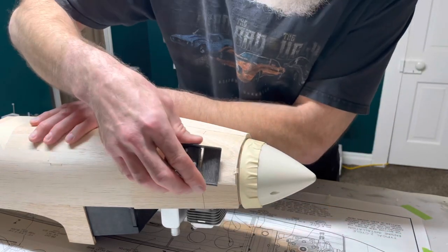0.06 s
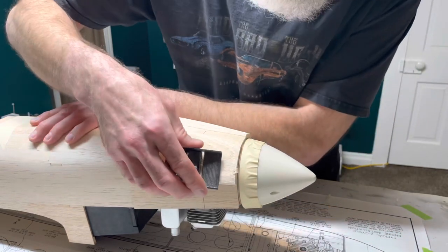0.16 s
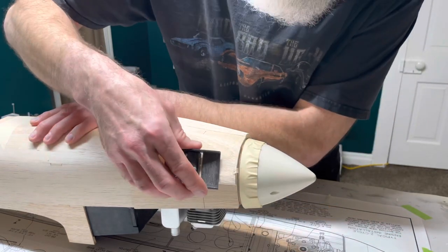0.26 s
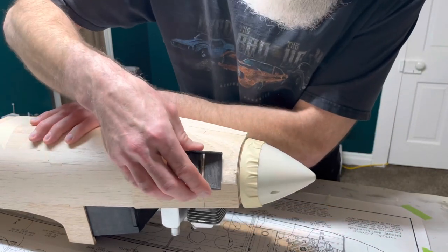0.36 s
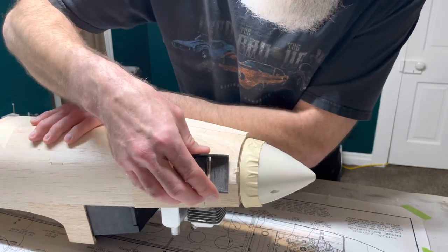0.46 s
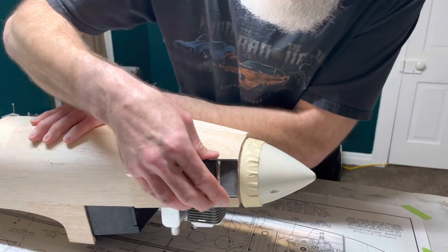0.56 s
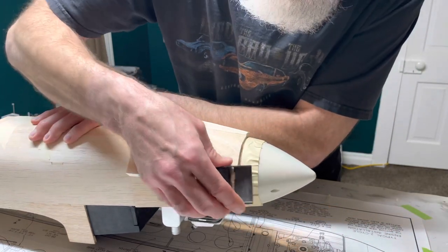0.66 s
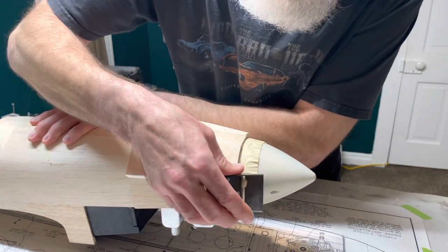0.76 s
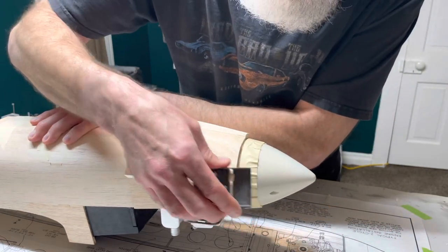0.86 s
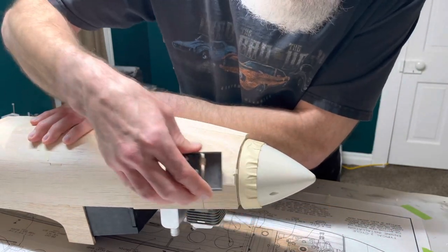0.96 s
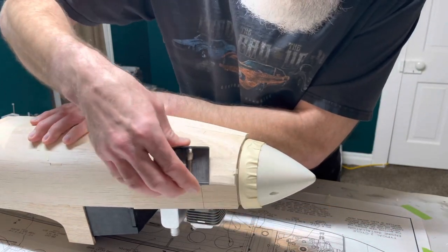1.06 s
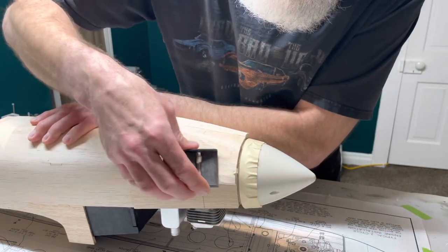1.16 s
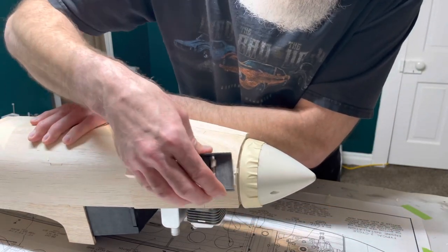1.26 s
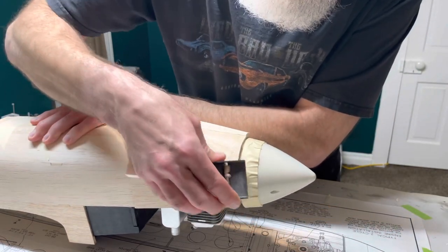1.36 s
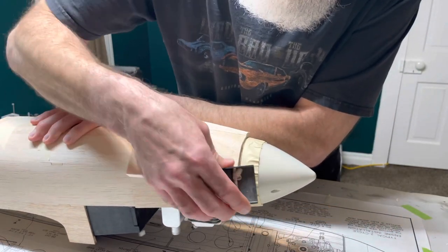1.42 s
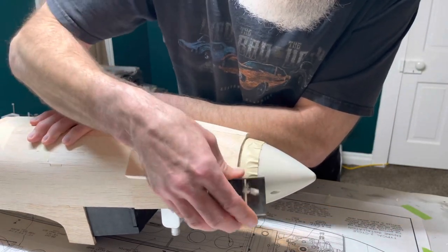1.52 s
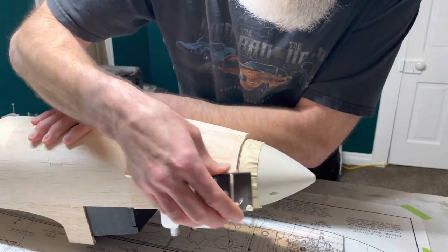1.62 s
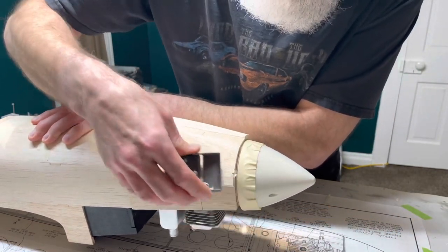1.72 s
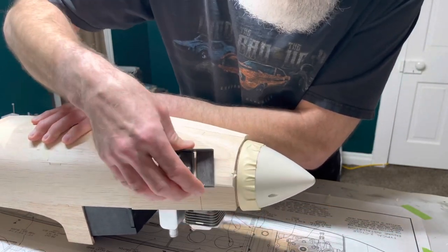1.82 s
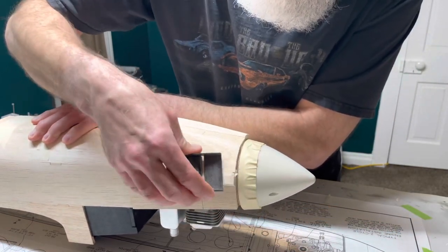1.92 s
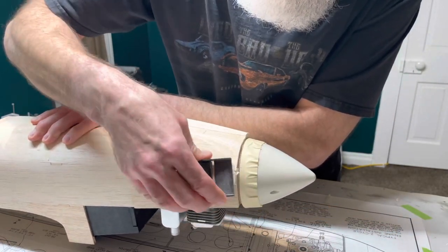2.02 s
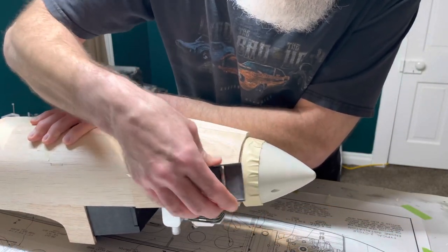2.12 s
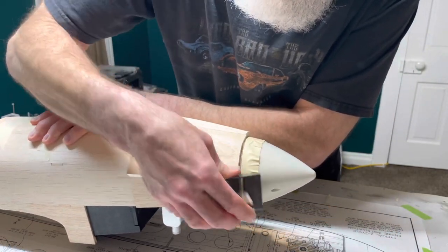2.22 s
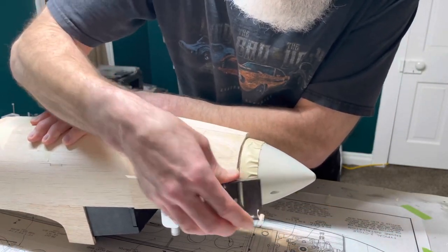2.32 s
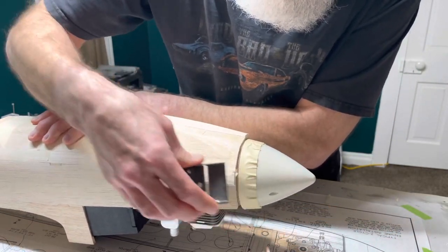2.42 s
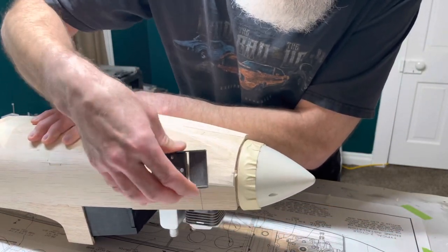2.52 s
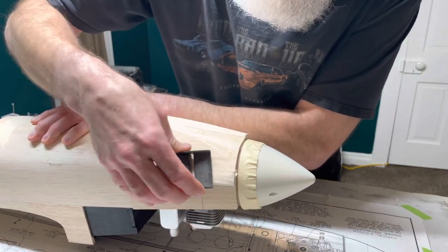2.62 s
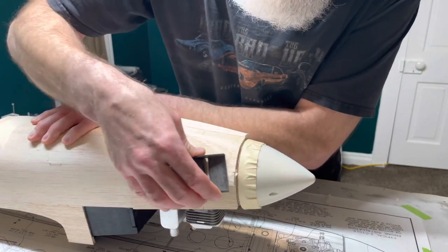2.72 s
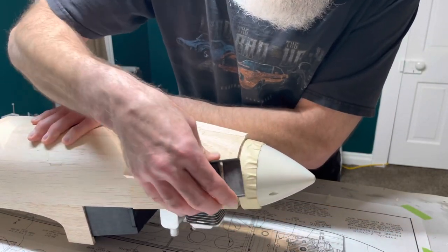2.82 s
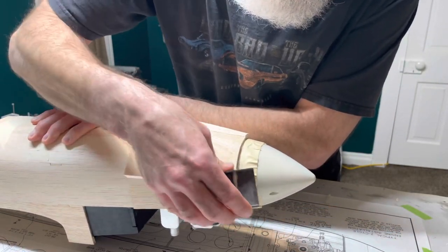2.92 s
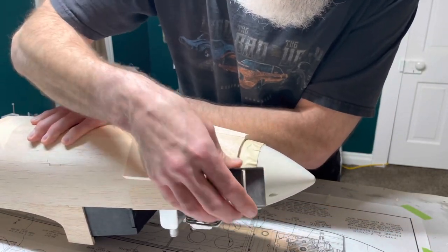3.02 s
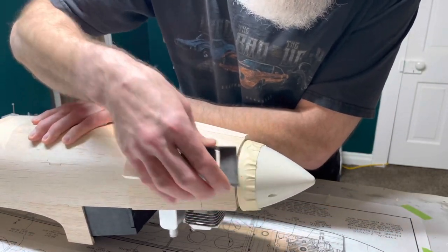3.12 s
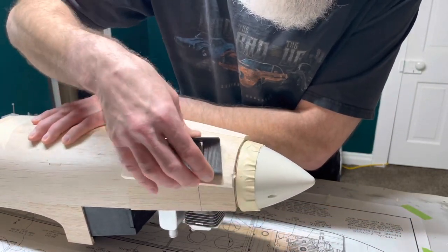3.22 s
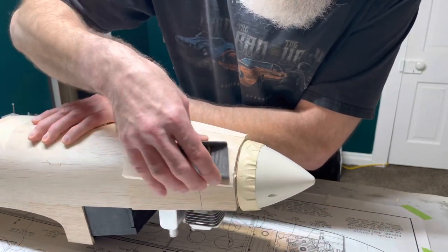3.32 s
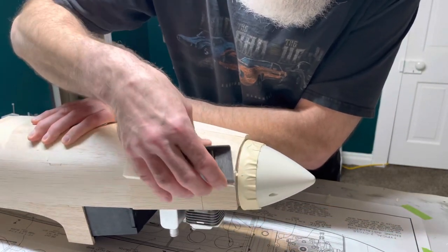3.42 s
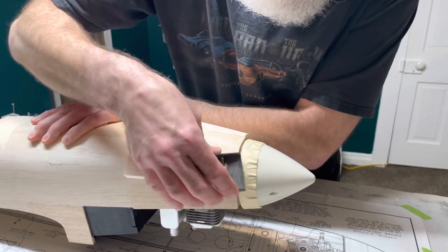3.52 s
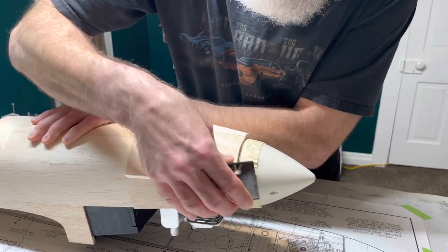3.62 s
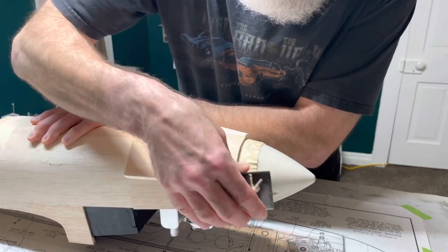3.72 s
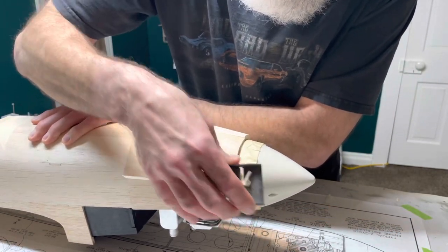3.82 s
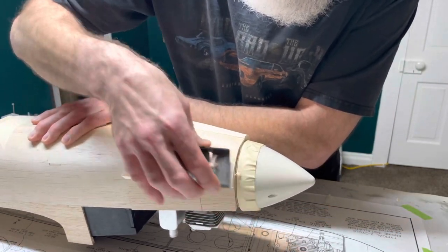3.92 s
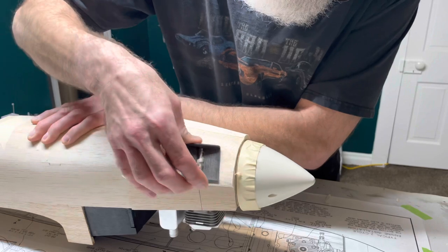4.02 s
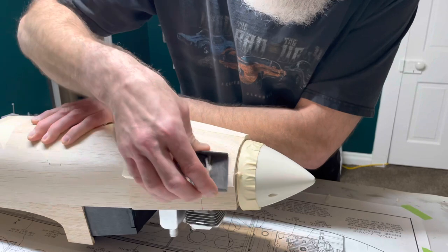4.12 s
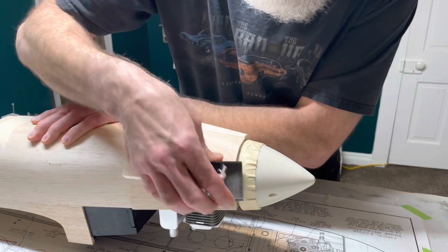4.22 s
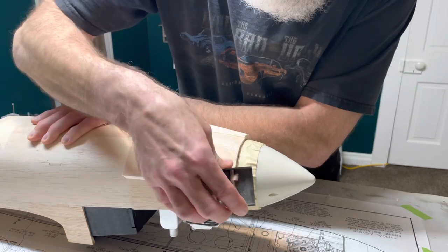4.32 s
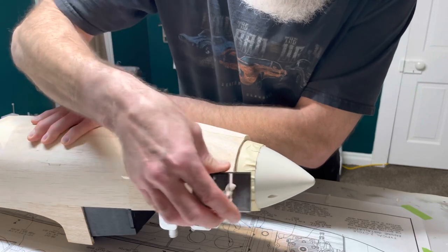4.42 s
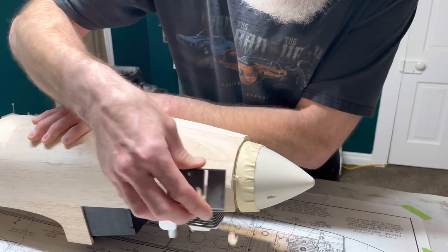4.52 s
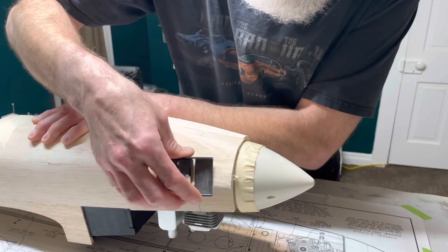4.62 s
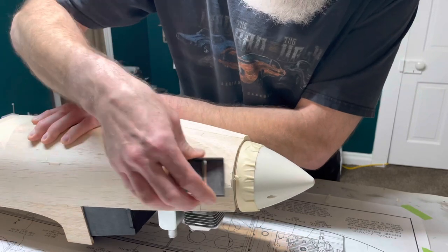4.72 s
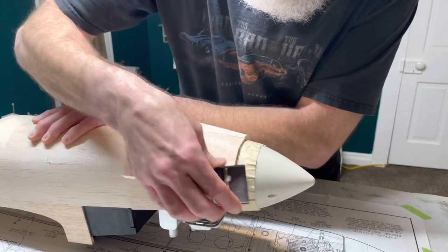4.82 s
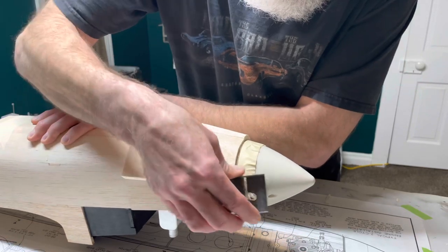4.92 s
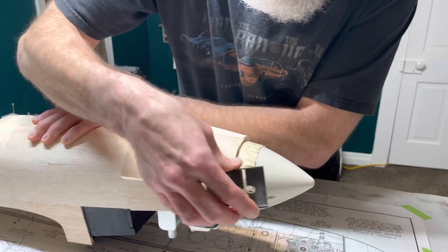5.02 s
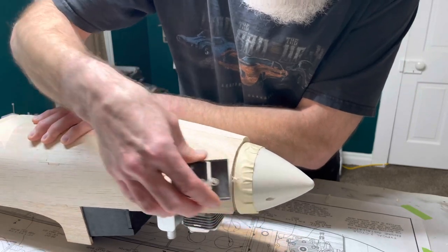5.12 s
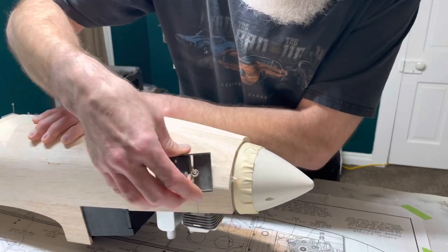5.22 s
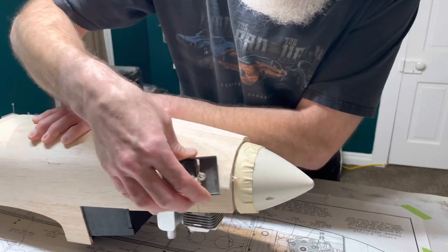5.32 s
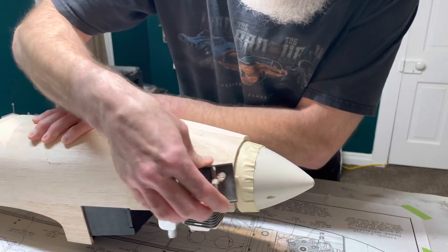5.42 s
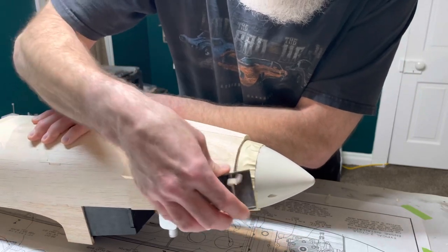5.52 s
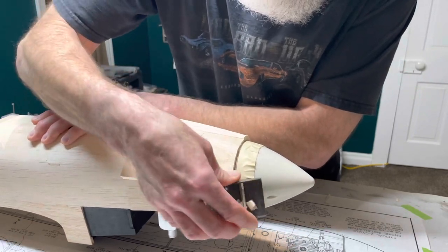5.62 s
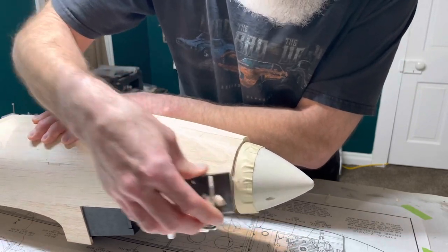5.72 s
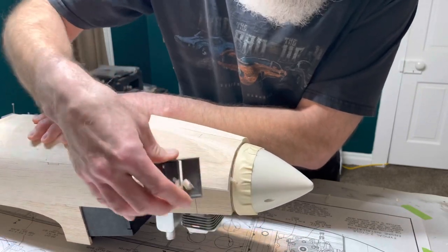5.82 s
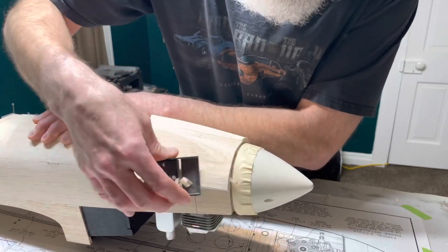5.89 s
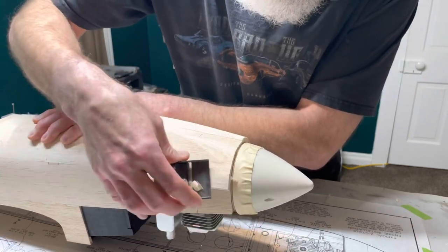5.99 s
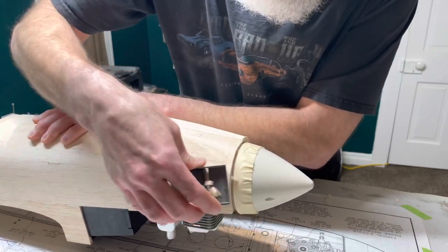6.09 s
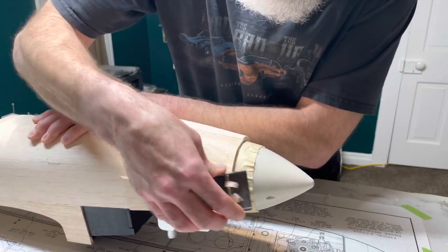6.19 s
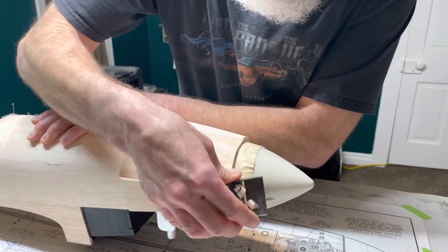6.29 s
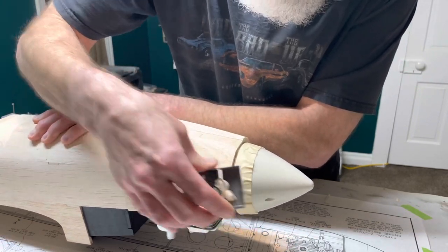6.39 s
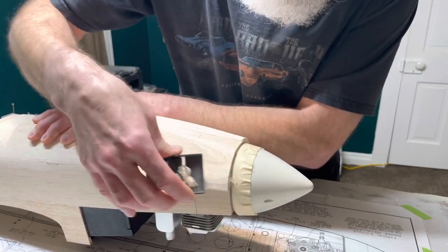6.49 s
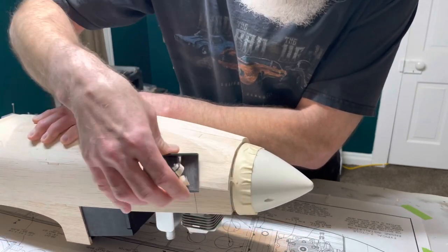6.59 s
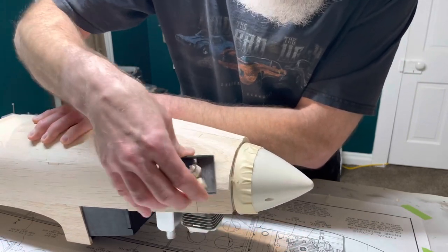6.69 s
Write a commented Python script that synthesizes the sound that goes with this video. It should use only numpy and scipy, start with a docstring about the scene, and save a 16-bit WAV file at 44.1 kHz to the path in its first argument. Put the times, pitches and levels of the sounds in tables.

```python
"""Planing a balsa hull

A small razor plane shaves the nose of a hollow balsa hull, close to a two-port mic in a quiet room.
Each stroke lands with a knock, tears fibres and lifts; the sole scuffs off the end and is drawn back.
Knocks and cut ring the same hull modes, and the hull rocks on its rest with dull thumps."""
import sys
import numpy as np
from scipy import signal
from scipy.fft import rfft, irfft, next_fast_len
from scipy.io import wavfile
from scipy.ndimage import uniform_filter1d, map_coordinates

SR = 44100
rng = np.random.default_rng(int(sys.argv[2]) if len(sys.argv) > 2 else 0)


def master_out(mix):
    """Clip the mix to full scale and print it as 16-bit PCM to the path in sys.argv[1]."""
    frames = np.transpose(np.atleast_2d(mix))
    ceiling = np.clip(frames, -1, 1)
    pcm = np.round(ceiling * 32767).astype(np.int16)
    wavfile.write(sys.argv[1], SR, pcm)


N = 297675
TIME = np.arange(N) / SR


def amp(db):
    """Decibels to gain."""
    return 10 ** (np.asarray(db) / 20)


def unit(x):
    """Scale to rms 1."""
    return x / np.sqrt(np.mean(x ** 2) + 1e-20)


def along(points, hz):
    """Read (f/Hz, value, ..) rows on a log frequency axis."""
    f, *cols = np.transpose(points)
    return np.squeeze([np.interp(np.log(hz + 1), np.log(f + 1), c) for c in cols])


def faders(spans, fade=0.012):
    """Gain curves from spans of (t/s, level/dB, ..) rows, fading beyond each span's ends."""
    total = np.zeros((len(spans[0][0]) - 1, N))
    for rows in spans:
        s, *cols = np.transpose(rows)
        span = slice(max(0, int((s[0] - fade) * SR)), int((s[-1] + fade) * SR))
        gate = np.clip(1 + np.minimum(TIME[span] - s[0], s[-1] - TIME[span]) / fade, 0, 1)
        total[:, span] += gate * amp([np.interp(TIME[span], s, c) for c in cols])
    return total


def decays(hits, t60, rise):
    """Percussive envelopes at (t/s, level/dB) hits."""
    out, t = np.zeros(N + SR), np.arange(SR // 2) / SR
    for s, db in hits:
        out[round(s * SR):][:len(t)] += amp(db - 60 * t / t60) * np.minimum(t / rise, 1)
    return out[:N]


def wobble(rate):
    """A smooth random curve, rate knots a second."""
    return map_coordinates(rng.standard_normal(int(N * rate / SR) + 4), [TIME * rate])


def noise():
    """Two white noises: one shared by left and right, one opposed."""
    return rng.standard_normal((2, N))


def filtered(x, response):
    """Apply a complex frequency response."""
    size = next_fast_len(N + SR // 2)
    return irfft(rfft(x, size) * response(np.fft.rfftfreq(size, 1 / SR)), size)[..., :N]


def coloured(x, spectrum):
    """EQ by (f/Hz, gain/dB) rows, then scale to rms 1."""
    return unit(filtered(x, lambda hz: amp(along(spectrum, hz))))


def fibres(grit_db, patchy_db=2):
    """Densely snapping fibres, uneven in strength and patchy in colour as the grain changes."""
    bins = signal.stft(noise(), nperseg=512)[2]
    grain = uniform_filter1d(rng.standard_normal(bins.shape[1:]), size=7, axis=0)
    grain = uniform_filter1d(grain, size=8, axis=1)
    patchy = signal.istft(bins * amp(patchy_db * unit(grain)), nperseg=512)[1][:, :N]
    return unit(patchy * amp(grit_db * (wobble(900) + 1.54 * wobble(90))))


def stereo(x, coherence, log_ratio=lambda hz: 0):
    """Decode mid and side; log_ratio is the log of the complex left-right ratio."""
    angle = lambda hz: np.arccos(np.clip(coherence(hz), 0, 1)) / 2
    mid, side = filtered(x, lambda hz: np.array([np.cos(angle(hz)), np.sin(angle(hz))]))
    left_right = np.array([mid + side, mid - side])
    return filtered(left_right, lambda hz: np.exp(np.outer([.5, -.5], log_ratio(hz))))


# Room decay: f/Hz, t60/s
ROOM_DECAY = [(200, 0.36), (2000, 0.33), (12000, 0.049)]
def room(x):
    """A short stereo reverb whose treble dies first."""
    hz, t, bins = signal.stft(rng.standard_normal((2, SR // 2)), SR, nperseg=256)
    tail = signal.istft(bins * amp(-60 * t / along(ROOM_DECAY, hz)[:, None]), SR, nperseg=256)[1]
    delayed = np.pad(x, (300, 0))[None]
    return signal.fftconvolve(delayed, tail / np.linalg.norm(tail[0]), axes=1)[:, :N]


# Rumble fader: t/s, level/dB
RUMBLE_FADER = [(0, -62.5), (.8, -57.5), (3.2, -55.5), (5.7, -59.5), (6.75, -56)]
# Rumble EQ: f/Hz, gain/dB
RUMBLE_EQ = [(20, -33), (30, -10), (48, 3), (72, -0.5), (102, -2), (135, -9), (195, -3.5), (400, -48)]
def rumble():
    """A lumpy low bed."""
    lumps = amp(3.1 * wobble(5.5))
    return faders([RUMBLE_FADER])[0] * unit(lumps * coloured(noise(), RUMBLE_EQ))


# Faint tone pair: f/Hz, gain/dB
TONE_PAIR = [(368, 18.5), (551, 17.5)]
# Tone pair fader cues: t/s, length/s, opening gain/dB
TONE_CUES = [(2.315, 0.33, -78), (3.037, 0.67, -70.5), (5.004, 0.1, -67), (5.685, 0.11, -69.5)]
def faint_tones(fall_db=12):
    """Faint wavering tones come in short, fading spells."""
    gain = faders([[(s, db), (s + length, db - fall_db)] for s, length, db in TONE_CUES])[0]
    return gain * sum(amp(db) * np.sin(2 * np.pi * hz * TIME + .5 * wobble(11)) for hz, db in TONE_PAIR)


# Low glide: t/s, f/Hz, level/dB
GLIDE = [(0, 170, -61), (.1, 188.3, -67.5), (0.289, 144.4, -62), (.36, 105, -64), (.46, 103, -62)]
def sinking_tone():
    """A faint low tone lifts a little, then slides down."""
    s, hz, db = np.transpose(GLIDE)
    phase = 2 * np.pi * np.cumsum(np.interp(TIME, s, hz)) / SR
    return faders([list(zip(s, db))])[0] * np.sqrt(2) * np.sin(phase)


# Back strokes, each lasting until the next cut: t/s, brush/dB, its fall/dB, drone/dB, its fall/dB
BACK_STROKES = [(0, -68, 2, -72.5, 0), (0.801, -67.5, -2, -59, 12), (1.568, -68, -5.5, -60, -1),
                (2.298, -63, 12, -65, -7), (3.002, -63, 6.5, -56.5, 2), (3.751, -57.5, 24, -50.5, 16),
                (4.378, -67.5, -5.5, -53, -2), (4.992, -60, 9.5, -57, 1), (5.648, -63.5, -1, -62, -1),
                (6.312, -64, 6, -54.5, 14)]
def back_stroke_gains():
    """Relative gains of the brushing and the hull's drone as the plane is drawn back."""
    return faders([[(s, brush, drone), (stroke[0], brush - brush_fall, drone - drone_fall)]
                   for (s, brush, brush_fall, drone, drone_fall), stroke in zip(BACK_STROKES, CUTS)])


# Brushing EQ: f/Hz, gain/dB
BRUSH_EQ = [(600, -13), (1200, 4), (2500, -6.5), (6500, -10), (10000, -16), (15500, -28)]
def brushing(floor_db=-85):
    """The returning plane brushes the wood, over a steady hiss of the same colour."""
    gain = amp(4) * back_stroke_gains()[0] + amp(floor_db)
    return gain * coloured(fibres(grit_db=1), BRUSH_EQ)


# Stereo image of the bed: f/Hz, coherence/0-1
BED_IMAGE = [(90, .97), (260, .7), (600, .15), (2000, 0), (4500, .4), (9500, .4), (13000, .9)]
def background():
    """Rumble, faint tones and brushing from all around."""
    return stereo(rumble() + faint_tones() + sinking_tone() + brushing(), lambda hz: along(BED_IMAGE, hz))


# Stereo image of the work: f/Hz, coherence/0-1, left lead/rad, left over right/dB
MIC_IMAGE = [(90, .95, 0, .3), (260, .8, .2, 2.8), (600, .5, .7, 4.6), (1400, .4, .7, 3),
             (2500, .5, 1.8, 1.7), (3600, .35, 2.6, 4.5), (6500, .1, 3.3, 4.2), (8000, .65, 3.3, 1.8),
             (8900, .93, 3.1, 0), (10600, .75, 2, .2), (12000, .8, .5, 0), (13000, 1, 0, 0)]
def mic_ports(x):
    """The two ports catch the close work at different phases and levels."""
    log_ratio = lambda hz: [0, 1j, np.log(10) / 20] @ along(MIC_IMAGE, hz)
    return stereo(x, lambda hz: along(MIC_IMAGE, hz)[0], log_ratio)


def radiated(x):
    """The light hull radiates no deep bass."""
    return filtered(x, lambda f: (1j * f / (170 + 1j * f)) ** 3)


# Rocking hits: t/s, level/dB, f/Hz
ROCKS = [(2.388, -34, 202), (3.058, -37.5, 258), (3.078, -27.5, 257), (3.101, -61, 417),
         (3.302, -34.5, 360), (3.818, -27.5, 246), (4.479, -29.5, 220), (4.564, -36, 305)]
# Scrape EQ: f/Hz, gain/dB
SCRAPE_EQ = [(150, -3.5), (350, 4), (800, -7.5), (1300, -12.5), (2200, -51)]
def thumps(rise_s=.004, t60_cycles=30):
    """The hull rocks: a short shudder around one pitch and a rough scrape on the rest."""
    out, t = np.zeros((2, N + SR)), np.arange(SR // 4) / SR
    for s, level_db, hz in ROCKS:
        tones = hz * np.array([[.9], [1.1], [1.45], [2.1]])
        phase = 2.96 * rng.standard_normal((2, 4, 1))
        decay = amp(np.array([[0], [-1], [-3], [-8]]) - 60 * t * tones / t60_cycles)
        ring = decay * np.sin(2 * np.pi * tones * t + phase) * (1 - np.exp(-t / rise_s))
        out[:, round(s * SR):][:, :len(t)] += amp(level_db) * ring.sum(1)
    scrape = coloured(fibres(grit_db=1.3), SCRAPE_EQ)
    scrape *= decays([row[:2] for row in ROCKS], t60=0.23, rise=0.0045)
    return radiated(out[:, :N]) + amp(-11) * scrape


# Sole friction EQ: f/Hz, gain/dB
SOLE_EQ = [(500, -6.5), (1500, -5), (3000, 5.5), (5000, -9), (8000, -18), (15000, -52)]
# Edge hiss EQ: f/Hz, gain/dB
EDGE_EQ = [(6000, -43), (8500, -11), (10500, 10.5), (12000, 10.5), (13500, 4), (15500, -2)]
# Slips: t/s, relative sole level/dB, edge level/dB
SLIPS = [(1.565, -46, -76), (2.2969, -39, -51.5), (3.001, -39, -56), (3.7457, -37, -50), (4.374, -60, -42),
         (4.385, -40, -53), (4.992, -41, -57), (5.679, -52, -82), (6.329, -52, -90)]
def scuffs():
    """The sole slips off the wood: a flick of friction with a longer rustle behind it."""
    sole, edge = [(s, db) for s, db, _ in SLIPS], [(s, db) for s, _, db in SLIPS]
    snap = amp(-2.5) * decays(sole, t60=0.072, rise=0.00032)
    rustle = amp(-6.5) * decays(sole, t60=0.25, rise=0.0084)
    flick = decays(edge, t60=0.063, rise=0.00074) * coloured(noise(), EDGE_EQ)
    return (snap + rustle) * coloured(noise(), SOLE_EQ) + flick


# Hull modes: f/Hz, gain/dB, t60 before added damping/s
HULL_MODES = [(300.8, 2.5, 0.066), (327.3, 3.5, 0.1), (364.6, 4, 0.12), (416.6, -2, 0.18),
              (463.5, -5, 0.17), (552, -3, 0.093), (634, -1, 0.056), (664.7, 0.5, 0.11), (738, 1, 0.068),
              (836, -3, 0.02), (1003, -5.5, 0.048), (1111, 0, 0.062), (1288, -2, 0.018), (1629, -3, 0.28),
              (1533, 0, .13), (1690, 2, .24), (1765, 0, .2), (1865, 2.5, .075), (2184, -1, 0.026),
              (2865, -7.5, 0.014), (3380, -4, 0.079), (3850, -6, 0.038), (4200, -8.5, 0.029),
              (4980, -10.5, 0.038), (5970, -15, 0.0061)]
def hull(f, damping):
    """Resonator bank of the hollow hull; the hand on the wood widens each mode."""
    total = 0
    for k, (hz, db, t60) in enumerate(HULL_MODES):
        width = damping * np.log(1000) / (np.pi * t60)
        total = total + (-1) ** k * amp(db) * 1j * f * width / (hz * hz - f * f + 1j * f * width)
    return total


# Landings: t/s, relative level/dB, spot pitch/Hz, trims of the low, upper, plate and high modes/dB,
# rebound loss/dB, flight/s
LANDINGS = [(0.133, -25, 730, -4.5, -41, -24.5, -27.5, 35, 0.03),
            (1.037, -32, 700, 0.5, -20, -21, -16.5, 22, 0.036),
            (1.755, -19, 701, -6.5, -14.5, -18, -21, 1.5, 0.0097),
            (2.509, -22, 715, -1, -31, -19.5, -22.5, 27, 0.025),
            (3.203, -29, 740, 2.5, -6, -27, -12.5, 29, 0.025),
            (3.998, -28.5, 702, -3, -14, -29, -31, 6, 0.026),
            (4.619, -9.5, 661, -17, -25.5, -15, -15.5, 34, 0.022),
            (5.197, -18, 700, -5, -15.5, -22, -14.5, 32, 0.026),
            (5.864, -18.5, 706, -4, -27, -24, -22.5, 30, 0.03),
            (6.544, -15, 694, -10.5, -33, -18.5, -26, 24, 0.026)]
def contacts(low_db=-7.5, higher_db=-16.5):
    """Each landing and its one rebound, whose trimmed bands sit these dB under the landing's."""
    rebounds = [(s + flight, db - loss, hz, low + loss + low_db, *(np.array(higher) + loss + higher_db))
                for s, db, hz, low, *higher, loss, flight in LANDINGS]
    return [row[:-2] for row in LANDINGS] + rebounds


def knocks(lead_s=.002, ring_share=0.76):
    """The plane lands, strikes the hull modes and rattles the wood; resting there shortens the ring."""
    out, t = np.zeros((2, N + SR)), np.arange(SR // 6) / SR
    hz, db, t60 = np.transpose(HULL_MODES)[:, :, None]
    side_phase = np.reshape([0, 1.1], (2, 1, 1))
    rise_s = np.select([hz < 580, hz < 900], [.0032, .0028], .0008)  # low modes swing up later
    damped = (hz > 580) * (abs(hz - 1650) > 150)  # the plane checks their big first swing
    attack = (1 - np.exp(-t / rise_s)) ** 2 * (1 + 3.6 * damped * np.exp(-t / 0.012))
    for s, level_db, spot_hz, low_db, upper_db, plate_db, high_db in contacts():
        spot_db = -14 * np.minimum(abs(hz - spot_hz) / 110, 1.3)
        trim_db = np.select([hz < 580, hz < 900, hz < 1400, hz < 2000],
                            [low_db, spot_db, upper_db, plate_db], high_db)
        gain_jitter, phase_jitter = rng.standard_normal((2, 2, len(hz), 1))
        # Loose joints blur each mode.
        drift = np.cumsum(rng.standard_normal((len(hz), len(t))), 1) * np.sqrt(hz * 0.022 / SR)
        decay = amp(db + trim_db + 2.6 * gain_jitter - 60 * t / (ring_share * t60))
        ring = attack * decay * np.sin(2 * np.pi * hz * t + drift + 0.38 * phase_jitter + side_phase)
        mid_side = amp(level_db + np.array([[0], [-6]]))
        out[:, round((s - lead_s) * SR):][:, :len(t)] += mid_side * ring.sum(1)
    bright = [(s - lead_s, level_db + high_db) for s, level_db, *_, high_db in contacts()]
    rattle = unit(filtered(noise(), lambda f: hull(f, damping=3.9) * f ** 2 / (f ** 2 + 1700 ** 2)))
    rattle *= decays(bright, t60=0.12, rise=0.0012)
    crack = decays(bright, t60=0.024, rise=0.0005) * coloured(noise(), SOLE_EQ)
    return amp(-2) * radiated(out[:, :N]) + amp(-5.5) * rattle + amp(-16) * crack


# Cuts: t/s, rise/s, lift pace/x, tear once biting/dB, tear at the lift/dB,
# trims of deep drone, panel drone, edge hiss, belly ring and sizzle/dB
CUTS = [(0.255, 0.16, 1.37, -48.5, -42, -9, -1.5, -12, -9, -9),
        (1.106, 0.023, 0.5, -47, -44, -11.5, -1.5, -11, -12, -10),
        (1.828, 0.074, 0.43, -45, -45.5, -10, -3, -11.5, -16, -10),
        (2.559, 0.047, 0.92, -51.5, -42, -10, -4, -10.5, -9.5, -12),
        (3.245, 0.021, 0.56, -49.5, -44.5, -9.5, -4, -13, -25, -11),
        (4.01, 0.14, 0.66, -44, -44, -8, -4, -13, -10.5, -9),
        (4.67, 0.086, 0.86, -42, -41.5, -9.5, -2.5, -11.5, -5.5, -6.5),
        (5.27, 0.076, 0.93, -44.5, -43.5, -10.5, -2, -11, 0, -7),
        (5.902, 0.11, 1.22, -45, -42, -7.5, -1.5, -12, -0.5, -7),
        (6.569, 0.11, 1.05, -43.5, -41.5, -10.5, -3, -11.5, -5.5, -9)]
# The blade leaves the wood, once a cut: t/s
LIFT_TIMES = [.722, 1.475, 2.224, 2.944, 3.645, 4.322, 4.876, 5.546, 6.226, 6.87]
# The blade catches and bites harder: t/s, boost/dB
BLADE_CATCHES = [(2.204, 3.5), (2.644, 4.5), (3.486, 1.5), (3.625, 0.5)]
# Dynamics of the tear, then the five trimmed layers:
# tracking/dB per dB of tear, last push/dB, drop at the lift/dB, release/dB per s
LAYER_DYNAMICS = [(1.5, -1, 5, 196), (2, 6, 12.5, 223), (1.9, -1.5, 1.5, 229), (1.44, -1, 5, 240),
                  (3, -11, 4, 234), (1.4, -0.5, 10, 280)]
def stroke_gains(pivot_db=-45, catch_s=0.038, push_s=.06, drop_s=.006):
    """Six layer envelopes: the blade bites in, bears down, pushes once more and lifts."""
    tracking, push_db, drop_db, release = np.transpose(LAYER_DYNAMICS)[:, :, None]
    catch_db = sum(db * np.exp(-((TIME - s) / catch_s) ** 2) for s, db in BLADE_CATCHES)
    total = 0
    for lift, (start, rise, pace, bite_db, lift_db, *trims) in zip(LIFT_TIMES, CUTS):
        t = TIME - start
        before, after = np.minimum(TIME - lift, 0), pace * np.maximum(TIME - lift, 0)
        attack_db = -10.5 * np.clip(1 - t / rise, 0, 1) ** 1.36
        tear_db = np.interp(t, [rise, lift - start], [bite_db, lift_db]) + catch_db + attack_db
        layer_db = pivot_db + tracking * (tear_db - pivot_db) + np.reshape([0, *trims], (-1, 1))
        layer_db += push_db * np.exp(before / push_s)
        layer_db -= drop_db * (1 - np.exp(-after / drop_s)) + release * after
        layer_db[-1] += 16 * before  # the sizzle swells as the shaving curls
        total = total + (t > 0) * amp(layer_db)
    return total


# Tearing EQ: f/Hz, gain/dB
TEAR_EQ = [(700, -26.5), (1100, -11), (2000, -5.5), (3100, -6.5), (4200, -6.5), (5300, -10), (5650, -16),
           (5900, -9.5), (8300, -11), (9000, -11), (11000, -116)]
# Belly rings under the sole: f/Hz, width/Hz, gain/dB
BELLY_RINGS = [(684, 31, 13), (1619, 61, -7)]
def cut(sizzle_hz=12800.):
    """The blade tears fibres, which hiss in the air and drive the hull."""
    tear, deep, panel, edge, ring, sizzle = stroke_gains()
    settle = decays([(s, db - 19) for s, db, *_ in LANDINGS], t60=0.11, rise=0.0091)
    between_cuts = back_stroke_gains()[1] + settle  # the hull drones on after a landing
    body = filtered(fibres(grit_db=0.5, patchy_db=1.03), lambda f: hull(f, damping=1.91))
    low = filtered(body, lambda f: 1 / (1 + (f / 1000) ** 6))
    bass = filtered(low, lambda f: 1 / (1 + (f / 560) ** 8))
    belly = filtered(body, lambda f: sum(amp(db) * np.exp(-((f - hz) / width) ** 2)
                                         for hz, width, db in BELLY_RINGS))
    drone = deep * unit(bass) + panel * unit(low - bass) + between_cuts * unit(low) + ring * unit(belly)
    rasp = 0.73 * coloured(body, TEAR_EQ) + 0.97 * coloured(fibres(grit_db=-1), TEAR_EQ)
    chatter = amp(0.79 * wobble(45))  # the blade bites unevenly
    hiss = coloured(fibres(grit_db=0.38), EDGE_EQ)
    top = filtered(hiss, lambda f: f ** 20 / (f ** 20 + sizzle_hz ** 20))
    return chatter * (drone + tear * rasp + amp(6.5) * edge * (hiss - top) + sizzle * unit(top))


def scene():
    """The work, direct and through the room, over the bed; mids and treble dip once, briefly."""
    blows, friction = knocks() + thumps(), cut() + scuffs()
    reverb = room(amp(-12) * blows[0] + amp(-12.5) * friction[0])
    mix = mic_ports(blows + friction + reverb) + background()
    bass = filtered(mix, lambda f: 1 / (1 + (f / 600) ** 4))
    dip = amp(-7 * np.exp(-((TIME - 3.962) / .023) ** 4))
    return bass + dip * (mix - bass)


def record(dry):
    """A brick-wall low-pass on the master."""
    return filtered(dry, lambda hz: hz < 15830)


dry = scene()
out = record(dry)
master_out(out)
```